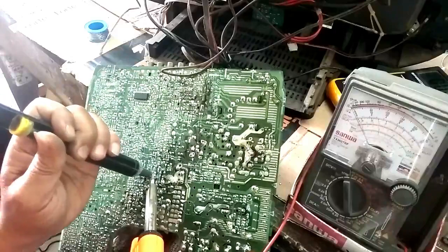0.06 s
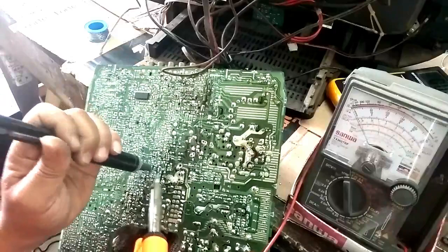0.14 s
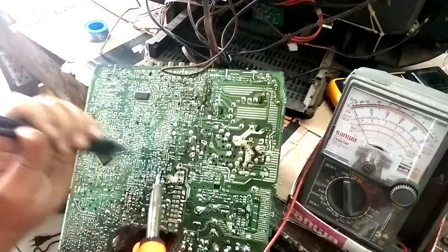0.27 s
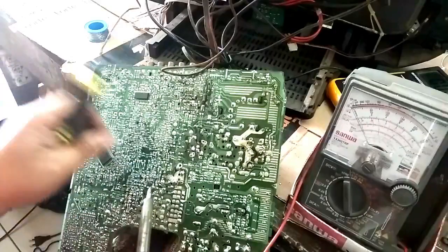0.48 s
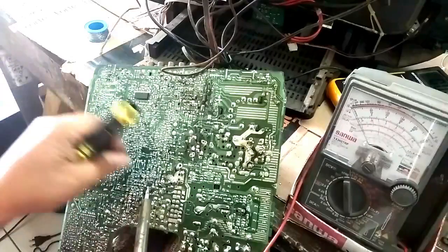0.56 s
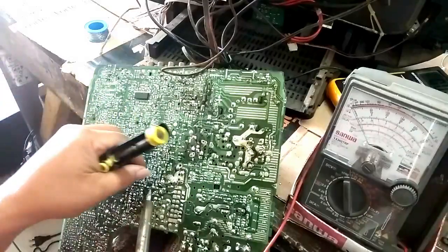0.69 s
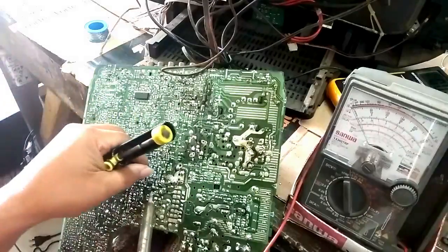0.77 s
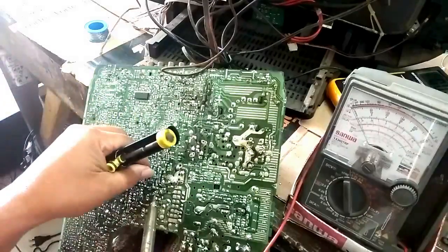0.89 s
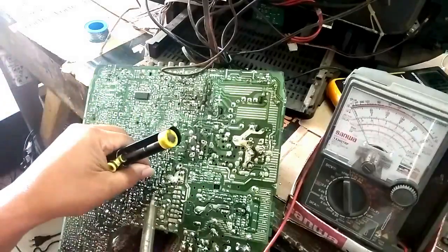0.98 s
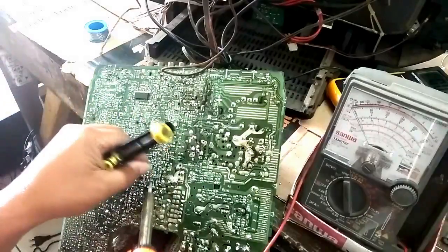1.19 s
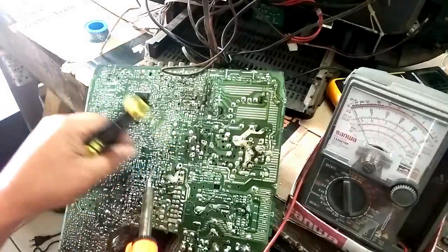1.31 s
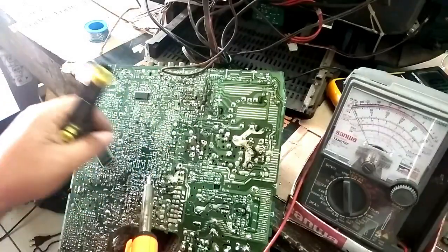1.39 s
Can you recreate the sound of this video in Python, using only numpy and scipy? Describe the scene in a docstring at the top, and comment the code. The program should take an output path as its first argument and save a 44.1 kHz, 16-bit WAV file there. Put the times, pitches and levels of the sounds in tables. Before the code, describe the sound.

A desoldering pump fires with one sharp, rattling snap, followed by faint taps.

```python
"""Solder sucker on a workbench

A spring-loaded solder sucker fires close by, over a circuit board: the catch lets go, the plunger
slams into its stop and rattles, the bench thumps and a small hard room rings on. Later come soft
taps on the board, a bright metal tick and a thin wavering whistle, over hiss and low rumble."""
import sys
import numpy as np
from scipy import signal
from scipy.fft import rfft, irfft, next_fast_len
from scipy.io import wavfile
from scipy.ndimage import map_coordinates

SR = 44100
rng = np.random.default_rng(int(sys.argv[2]) if len(sys.argv) > 2 else 0)


def wav_out(sig):
    """Save sig, one row per channel (or a flat mono array), as 16-bit PCM at SR to the path in sys.argv[1]."""
    wavfile.write(sys.argv[1], SR, np.round(np.clip(np.atleast_2d(sig).T, -1, 1) * 32767).astype(np.int16))


N = 63945
TIME = np.arange(N) / SR


def amp(db):
    return 10 ** (np.asarray(db) / 20)


def unit_rms(x):
    return x / np.sqrt(np.mean(x ** 2) + 1e-20)


def curve_at(points, hz):
    """Read (Hz, value) points along a log frequency axis."""
    freqs, values = np.transpose(points)
    return np.interp(np.log(hz + 1), np.log(freqs + 1), values)


def since(start):
    """Seconds since start, zero before it."""
    return np.maximum(TIME - start, 0)


def filtered(x, response):
    """Shape x with a gain given as a function of Hz."""
    size = next_fast_len(N + SR // 2)
    return irfft(rfft(x, size) * response(np.fft.rfftfreq(size, 1 / SR)), size)[..., :N]


def noise(spectrum, tilt_db=0):
    """Two unrelated channels of coloured noise, rms 1, tilted by tilt_db per octave."""
    colour = lambda hz: amp(curve_at(spectrum, hz) + tilt_db * np.log2((hz + 50) / 1000))
    return unit_rms(filtered(rng.standard_normal((2, N)), colour))


def wobble(per_s):
    """Two smooth random curves with per_s knots a second."""
    return np.array([map_coordinates(rng.standard_normal(2000), [TIME * per_s]) for _ in range(2)])


def sine(hz):
    """A tone that follows a pitch curve."""
    return np.sin(2 * np.pi * np.cumsum(hz, axis=-1) / SR)


def pan(left_db):
    return amp([[left_db / 2], [-left_db / 2]])


def burst(start, t60, rise_s):
    """An envelope with a fast rise and an exponential fall."""
    t = since(start)
    return (1 - np.exp(-t / rise_s)) * amp(-60 * t / t60)


def ring(modes, start, scatter_db, tilt_db=0, rise_s=.00089):
    """A struck body's modes dying away, their balance a little different on each hit."""
    out = 0
    for hz, db, t60 in modes:
        gain = amp(db + tilt_db * np.log2(hz / 300) + scatter_db * rng.normal())
        out += gain * burst(start, t60, rise_s) * np.sin(2 * np.pi * hz * since(start))
    return out


# The rumble's colour. Each row: frequency in Hz, relative noise density in dB.
RUMBLE_COLOUR = [(8.2, -46), (14, 15), (34, -1), (98, -8.5), (140, -16), (236, -21.5), (305, -22),
                 (373, -23.5), (590, -29.5), (800, -37.5), (1040, -59), (1760, -120)]
# Its swells. Each row: time in seconds, level in dB, left-right likeness from 0 to 1.
RUMBLE_SWELLS = [(0, -37, 0.84), (.2, -40.5, 0.4), (.42, -35, 0.53), (.6, -44, 0.3), (.8, -46, 0),
                 (0.92, -37.5, 0.7), (1.082, -43, 0.6), (1.17, -40.5, 1), (1.45, -48, 0)]
def rumble():
    """A deep rumble that swells and shifts in stereo width."""
    times, db, likeness = np.transpose(RUMBLE_SWELLS)
    width = np.arccos(np.interp(TIME, times, likeness)) / 2
    mid, side = noise(RUMBLE_COLOUR) * [np.cos(width), np.sin(width)]
    return amp(np.interp(TIME, times, db)) * np.array([mid + side, mid - side])


# The hand's movement. Each row: time in seconds, level in dB.
RUSTLE_LEVELS = [(0, -67), (.18, -62), (.5, -72), (.88, -95), (.93, -56.5), (1.1, -62), (1.28, -60),
                 (1.36, -70.5), (1.45, -71)]
# The rustle's colour. Each row: frequency in Hz, relative noise density in dB.
HAND_COLOUR = [(300, -57), (700, -4.5), (1600, -0.5), (3000, -7), (6000, -12), (9500, 4), (13000, -21.5)]
def rustle():
    """A hand brushes faintly over board and wires."""
    level_db = np.interp(TIME, *np.transpose(RUSTLE_LEVELS)) + 2.7 * wobble(27.1)
    return amp(level_db) * noise(HAND_COLOUR)


# The hiss's colour. Each row: frequency in Hz, relative noise density in dB.
HISS_COLOUR = [(290, -37), (500, -21), (747, -8), (1070, -12.5), (2290, -9.5), (2640, -4.5), (2880, -5),
               (3140, -5.5), (6080, -5.5), (15400, -8)]
def hiss():
    """A nearly steady bed of microphone hiss."""
    return amp(-55 + .78 * wobble(9.8)) * noise(HISS_COLOUR)


# The drone's swells. Each row: time in seconds, level in dB.
DRONE_LEVELS = [(0, -61.5), (.6, -57), (0.849, -64), (1.1, -57), (1.351, -48.5), (1.45, -59)]
def drone(centre_hz=74, half_width_hz=40):
    """A low, unsteady drone of narrow noise, dead centre."""
    band = lambda hz: 1 / (1 + ((hz - centre_hz) / half_width_hz) ** 2)
    level_db = np.interp(TIME, *np.transpose(DRONE_LEVELS))
    return amp(level_db) * unit_rms(filtered(rng.standard_normal(N), band))


# The plunger's hits. Each row: start in seconds, level in dB, t60 in seconds,
# pan to the left in dB, brightness in dB per octave.
PLUNGER_HITS = [(.2082, -29, .3, 3, 0), (.2157, -14, .1, -4, 1), (.2173, -8, .014, -6, 2),
                (.2222, -13, .12, 0, 1), (.2264, 2, .03, -2, 1), (.2296, 3, .016, 2, 2),
                (.2345, -8, .04, 3, 1.5), (.2390, -8, .045, 5, 1), (.2490, -15, .04, -4, 0)]
# The snap's colour. Each row: frequency in Hz, relative noise density in dB.
SNAP_COLOUR = [(410, -43), (700, -14), (1250, -13.5), (1780, -14), (2130, -7), (3270, -11.5), (3820, -6.5),
               (8190, -1), (11900, 1), (15400, -6.5)]
def plunger():
    """Each contact of the plunger sets spring and tube rattling in a bright, gritty burst."""
    grain = amp(2.5 * wobble(per_s=900))
    out = 0
    for start, db, t60, left_db, tilt_db in PLUNGER_HITS:
        rattle = unit_rms(noise(SNAP_COLOUR, tilt_db) * grain)
        out += amp(db) * pan(left_db) * burst(start, t60, rise_s=.0007) * rattle
    return out


# The barrel's resonances. Each row: centre in Hz, width in Hz, relative level in dB.
BARREL_MODES = [(2140, 150, -29), (2570, 130, 3.5), (3853, 220, 5.5), (4860, 48, 5), (4880, 46, -6),
                (5470, 150, 5.5), (7300, 80, 10.5), (8630, 150, -19), (10400, 220, -8), (11830, 130, -13),
                (13000, 310, -4)]
def barrel():
    """The barrel rings on after the main slam with a rough, fluttering edge."""
    def resonances(hz):
        return sum(amp(db) / (1 + (2 * (hz - centre) / width) ** 2) for centre, width, db in BARREL_MODES)
    ringing = unit_rms(filtered(rng.standard_normal((2, N)), resonances))
    flutter = amp(6.3 * wobble(294))
    slam_s = PLUNGER_HITS[4][0]
    return amp(-32.5) * burst(slam_s, t60=.32, rise_s=.0023) * ringing * flutter


# Jolts into the bench. Each row: start in seconds, level in dB, brightness in dB per octave.
BENCH_JOLTS = [(0.2161, -33.5, -13.5), (.2280, -12.5, -1), (.2520, -19, 9), (.2620, -19.5, -0.5),
               (.2720, -25, 9), (0.929, -50, -8.5), (0.999, -53.5, 11), (1.147, -45, -14),
               (1.158, -48, -19), (1.303, -46, 1)]
# The body of bench and board. Each row: pitch in Hz, relative level in dB, t60 in seconds.
BENCH_MODES = [(145, -11, .12), (218, -3, .05), (272, -4, .05), (322, -4, .04), (420, -16, .04),
               (490, -11, .05), (544, -15, .08), (645, -14, .04)]
def bench(lowest_mode_hz=75.5):
    """The recoil thumps the bench and leaves its top shuddering; later touches knock it lightly."""
    thumps = sum(amp(db) * ring(BENCH_MODES, start, scatter_db=2.5, tilt_db=tilt_db)
                 for start, db, tilt_db in BENCH_JOLTS)
    recoil_s = BENCH_JOLTS[1][0]
    shudder = sine(lowest_mode_hz + 4 * wobble(19.4)) * burst(recoil_s, t60=.5, rise_s=.057)
    return thumps + amp(-19.5) * shudder


# The room's main decay. Each row: frequency in Hz, t60 in seconds.
ROOM_DECAY = [(100, 1), (300, 0.12), (1000, 0.42), (3000, 0.3), (6000, 0.35), (11000, 0.28), (15500, 0.2)]
# The reverb's tone. Each row: frequency in Hz, relative level in dB.
ROOM_TONE = [(100, -8.5), (400, 6.5), (1200, -1.5), (2500, 2.5), (3300, 3), (4800, 6.5), (6500, -3),
             (9000, -1.5), (15500, 2)]
def room(x, predelay_s=.004, late_db=-16.5, late_stretch=2.86):
    """A small hard room rings, each band at its own speed; the workshop adds a weaker, slower tail."""
    hz, t, bands = signal.stft(rng.standard_normal((2, SR)), SR, nperseg=256)
    fall_db = -60 * t / curve_at(ROOM_DECAY, hz)[:, None]
    decay = amp(fall_db) + amp(late_db + fall_db / late_stretch)
    colour = amp(curve_at(ROOM_TONE, hz))[:, None]
    tail = signal.istft(bands * colour * decay, SR, nperseg=256)[1]
    tail = np.pad(tail / np.linalg.norm(tail[0]), ((0, 0), (int(predelay_s * SR), 0)))
    return signal.fftconvolve(x, tail, axes=1)[:, :N]


def hand_recoil(centre_s=.240, width_s=.0055):
    """One low heave, well to the left, as the hand recoils."""
    u = (TIME - centre_s) / width_s
    return amp(-23) * pan(12.8) * (u * u - 1) * np.exp(-u * u / 2)


def spring_hum(hz=271, start_s=.325, damp_s=.445):
    """A low, wavering hum after the snap, soon damped: perhaps the coil spring settling."""
    waver, flicker = wobble(45.1)
    envelope = burst(start_s, t60=.8, rise_s=.015) * amp(-60 * since(damp_s) / .1)
    return amp(-39 + 2.5 * flicker) * envelope * sine(hz + 6 * waver)


# Taps on the board. Each row: start in seconds, level in dB, t60 in seconds,
# brightness in dB per octave, level of the board's ring in dB.
BOARD_TAPS = [(.925, -54, 0.15, -4.5, -64), (0.932, -52, 0.075, -4, -51), (1.1362, -42.5, 0.06, 1, -58),
              (1.150, -48, .08, -2, -60), (1.291, -45, 0.07, 3, -60)]
# A tap's colour. Each row: frequency in Hz, relative noise density in dB.
TAP_COLOUR = [(60, -2), (200, -13), (500, -10), (1000, -15), (2300, -8.5), (4500, -23), (10000, -17),
              (15500, -24)]
# The circuit board's ring. Each row: pitch in Hz, relative level in dB, t60 in seconds.
BOARD_MODES = [(458, 0, .06), (958, -12, .04), (1550, -5, .09), (1770, -10, .04), (2240, -12, .04)]
def taps(spread=.8):
    """Soft, grainy touches, each ringing the circuit board a little."""
    out = 0
    for start, db, t60, tilt_db, ring_db in BOARD_TAPS:
        mid, side = noise(TAP_COLOUR, tilt_db) * amp(2 * wobble(400))
        touch = np.array([mid + spread * side, mid - spread * side])
        out += amp(db) * burst(start, t60, rise_s=.0004) * touch
        out += amp(ring_db) * ring(BOARD_MODES, start, scatter_db=1.5)
    return out


# The tick's chatter. Each row: delay after the first hit in seconds, relative level in dB.
METAL_BOUNCES = [(0, 0), (.0008, -3), (.0018, -3), (.0032, -9), (.0046, -11)]
# The metal's ping. Each row: pitch in Hz, relative level in dB, t60 in seconds.
METAL_MODES = [(2500, -13, .007), (4300, -20, .006), (5600, -6, .008), (7500, -9, .006), (8500, -5, .005),
               (9730, -1, .005), (10600, -4, .004), (12700, -9, .04), (14300, -12, .008)]
# The crack and fizz under it. Each row: frequency in Hz, relative noise density in dB.
TICK_COLOUR = [(590, -40), (1000, -20), (2300, -14), (3500, -20), (6500, -16), (8700, -2), (10200, 0),
               (11500, -6), (13000, -4), (15400, -12)]
def metal_tick(start_s=.99, left_lag_s=.000214):
    """A small metal part clicks, chatters and fizzes out; its pings reach the right side first."""
    pings = np.zeros((2, N))
    for channel, lag in enumerate((left_lag_s, 0)):
        for delay, db in METAL_BOUNCES:
            pings[channel] += amp(db) * ring(METAL_MODES, start_s + delay + lag, scatter_db=5, rise_s=1e-4)
    crack = amp(3) * burst(start_s, t60=.044, rise_s=.00016)
    fizz = amp(-17) * burst(start_s, t60=.15, rise_s=.0035)
    return amp(-29) * (pings + (crack + fizz) * noise(TICK_COLOUR))


# The whistle's glide. Each row: time in seconds, pitch in Hz.
WHISTLE_GLIDE = [(1.04, 12150), (1.075, 11900), (1.105, 11520), (1.14, 11430), (1.175, 12050),
                 (1.215, 12750), (1.24, 12500), (1.285, 11300)]
def whistle(fade_s=.022, waver_hz=50, airy_share=.6):
    """A thin, airy high tone on the right that dips, rises and falls."""
    times, hz = np.transpose(WHISTLE_GLIDE)
    fade = np.clip(np.minimum(TIME - times[0], times[-1] - TIME) / fade_s, 0, 1)
    waver, flicker = wobble(350)
    tone = sine(np.interp(TIME, times, hz) + waver_hz * waver)
    airiness = 1 - airy_share + airy_share * flicker
    return amp(-55.5) * pan(-8) * fade * airiness * tone


def scene():
    """The impacts feed the room; hum, whistle and the noise beds stay dry."""
    impacts = plunger() + barrel() + bench() + hand_recoil() + metal_tick() + taps()
    reverb = amp(-6.5) * room(impacts)
    return impacts + reverb + spring_hum() + whistle() + drone() + rumble() + rustle() + hiss()


def record(dry):
    """The snap overloads the input, and a steep low-pass trims the very top."""
    hardness, cutoff_hz, slope_width_hz = 17, 15650, 300
    clipped = dry / (1 + np.abs(dry) ** hardness) ** (1 / hardness)
    lowpass = lambda hz: np.sin(np.pi / 2 * np.clip((cutoff_hz - hz) / slope_width_hz + .5, 0, 1)) ** 2
    return np.clip(filtered(clipped, lowpass), -1, 1)


dry = scene()
out = record(dry)
wav_out(out)
```